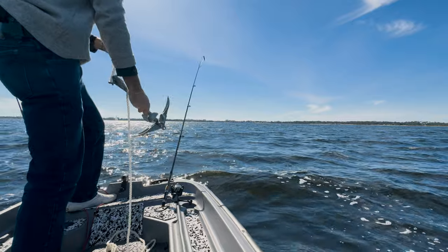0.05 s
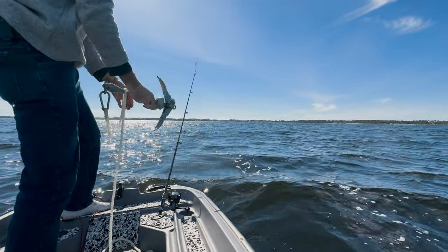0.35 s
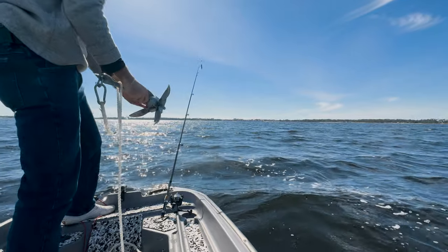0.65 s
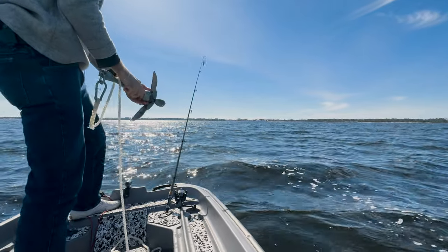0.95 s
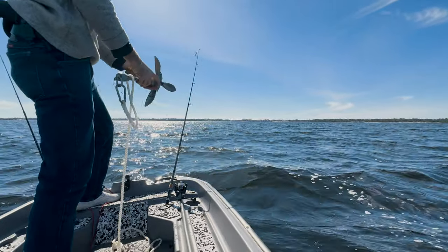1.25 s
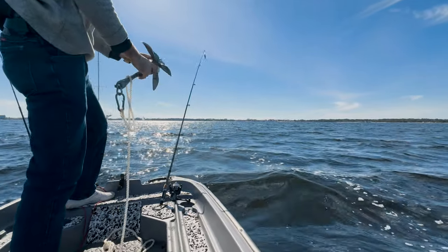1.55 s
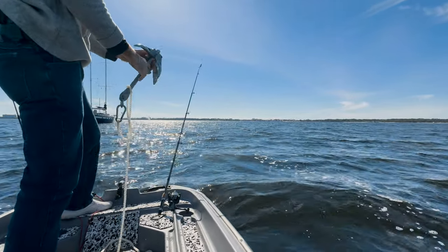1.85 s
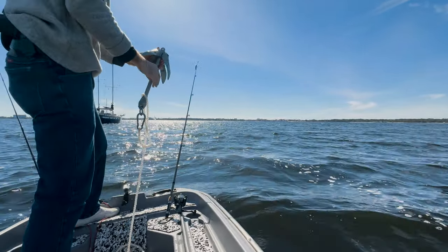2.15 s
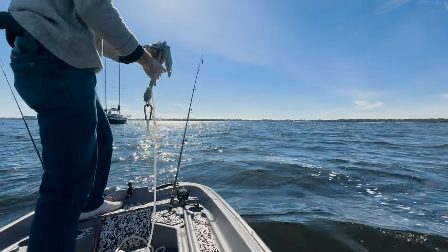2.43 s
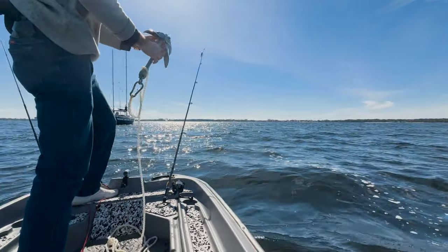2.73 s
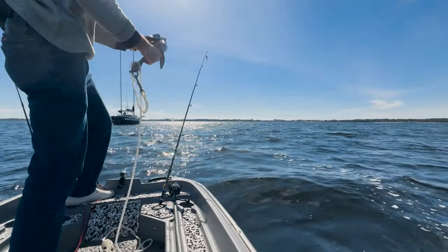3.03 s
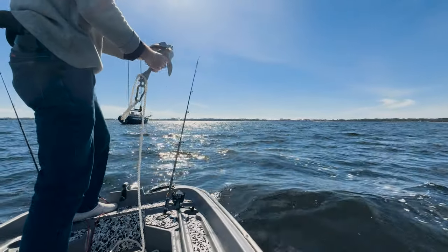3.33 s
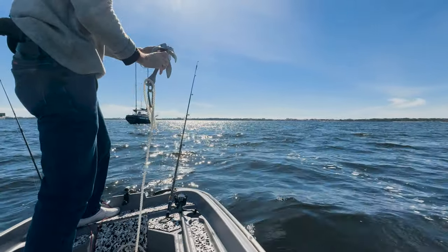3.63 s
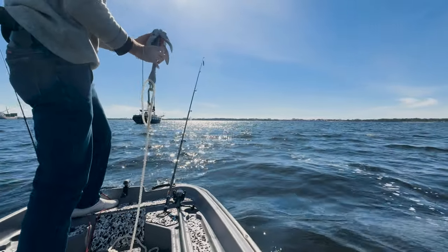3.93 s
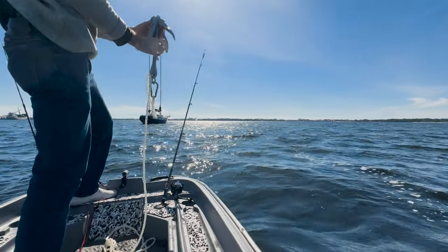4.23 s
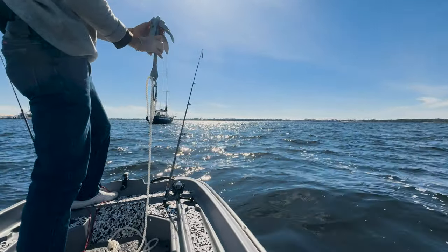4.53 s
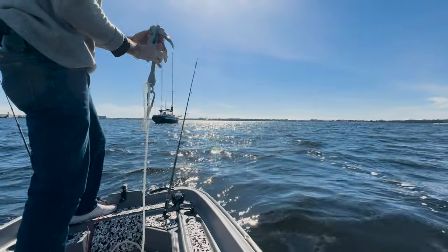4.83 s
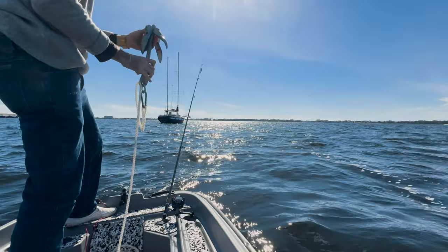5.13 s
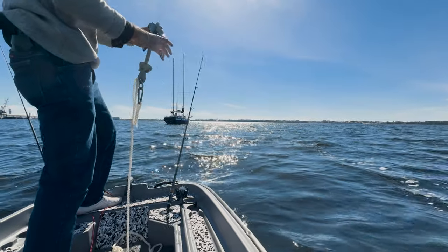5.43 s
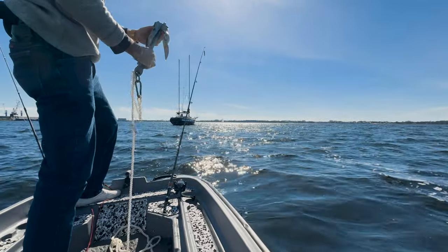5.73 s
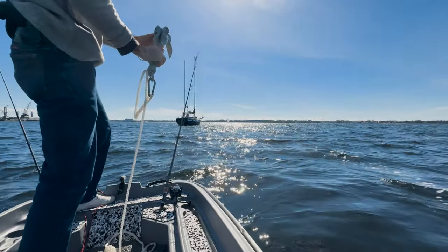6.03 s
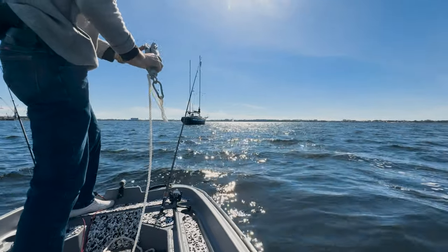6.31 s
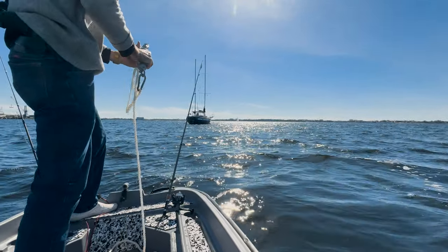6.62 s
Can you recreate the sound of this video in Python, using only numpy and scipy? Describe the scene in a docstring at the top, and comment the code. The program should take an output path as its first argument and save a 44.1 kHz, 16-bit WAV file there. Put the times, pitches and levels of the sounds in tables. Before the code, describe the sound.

Irregular sharp clinks of a handled metal anchor, over water sloshing at a small boat's hull and brief deck creaks.

```python
"""A folding steel anchor and its shackle clink, scrape and tick in someone's hands on a small boat's bow:
each contact excites the normal modes of the steel. The deck creaks by stick-slip friction as the boat
rolls, waves lap at the hull and trap air that rings as bubbles, sleeves and rope rustle, and open water
washes all round. The sound reaches two widely spaced microphones close by, slightly out of phase."""
import sys
import numpy as np
from scipy import signal
from scipy.fft import rfft, irfft, next_fast_len
from scipy.io import wavfile
from scipy.ndimage import uniform_filter1d, map_coordinates

SR = 44100
rng = np.random.default_rng(int(sys.argv[2]) if len(sys.argv) > 2 else 0)


def to_wav(s):
    """Save 16-bit WAV."""
    ch = np.atleast_2d(s).T  # columns
    pcm = np.round(np.clip(ch, -1, 1) * 32767)  # PCM
    wavfile.write(sys.argv[1], SR, pcm.astype(np.int16))


N = 298557

# Swell of the open water. Each row: time in seconds, relative level in dB.
SWELL_LEVELS = [(0.0, -55), (0.56, -55.5), (0.79, -57.5), (1.32, -51), (1.45, -55), (1.96, -56),
                (3.34, -56), (3.66, -54), (3.94, -57.5), (4.22, -54), (4.66, -58), (5.13, -51.5),
                (5.51, -58), (5.64, -56.5), (6.01, -55), (6.77, -57)]
# Steel striking steel. Each row: start in seconds, clack level in dB, clack pitch ratio, clack t60 in
# seconds, ring level in dB, nominal ring t60 in seconds, ring tilt in dB per octave, parts struck.
IMPACTS = [(0.0274, -53, 2, 0.026, -42, .19, -5, "link"), (.045, -43, 1.3, 0.047, -39.5, 0.047, 7, "link"),
           (0.0625, -34, 2.4, 0.027, -36, 0.031, 3, "link"),
           (.524, -32.5, 0.78, 0.034, -36.5, 0.83, -3.5, "shackle"),
           (1.237, -39, 0.73, 0.038, -46.5, 0.047, -21.5, "anchor shackle"),
           (1.4154, -37.5, 0.88, 0.034, -43, 0.088, 0, "shackle"),
           (1.476, -40, 1.44, 0.069, -36, 0.089, -3.5, "anchor"),
           (1.4905, -40.5, 1.3, 0.063, -36.5, 0.048, -10, "anchor"),
           (2.0595, -23, 0.82, 0.023, -19, 0.073, 0.5, "shackle"),
           (2.7812, -23.5, 1.6, 0.013, -9, 0.043, 0.5, "shackle"),
           (2.786, -23.5, 1.45, 0.034, -12.5, 0.026, -7, "anchor shackle"),
           (4.333, -42, 1.05, .018, -45.5, .15, -2.5, "anchor"),
           (4.8292, -31.5, 1.25, 0.042, -37, 0.12, 8, "anchor shackle"),
           (4.971, -24, 1.1, 0.031, -28, 0.063, 2, "anchor"),
           (4.991, -27.5, 0.93, 0.024, -36, 0.064, 0.5, "anchor shackle"),
           (5.0084, -21.5, 1.08, 0.036, -27.5, 0.15, -6, "anchor shackle"),
           (6.1353, -23, 1.09, 0.0036, -8, 0.2, -1, "anchor"),
           (6.139, -22.5, 2.9, 0.0061, -41, .05, 0.5, "anchor"),
           (6.2092, -38.5, 0.91, 0.029, -30, .096, -5.5, "anchor"),
           (6.237, -46, 1.03, 0.043, -29, 0.037, 0, "anchor"),
           (6.6394, -30, 0.93, 0.023, -17.5, 0.055, 8.5, "anchor"),
           (6.644, -38, 1.03, 0.11, -26, 0.091, 13, "anchor"),
           (6.6822, -44, 1.2, 0.017, -49.5, 0.14, -12, "anchor")]
# Steel sliding on steel. Each row: start in seconds, length in seconds, level in dB.
SLIDES = [(0.054, 0.022, -49.5), (2.019, 0.043, -48), (2.656, 0.036, -51.5), (2.768, 0.038, -43),
          (3.527, 0.044, -53.5), (4.926, 0.029, -41.5), (4.963, 0.016, -34.5), (5.011, 0.057, -41),
          (6, 0.019, -49), (6.625, 0.0076, -44.5)]
# Waves at the hull. Each row: crest time in seconds, rise time in seconds, level in dB.
WAVE_CRESTS = [(0.079, 0.0085, -44), (.755, 0.029, -48.5), (.98, 0.04, -53), (1.275, 0.068, -51),
               (1.76, 0.031, -53.5), (2.2, 0.073, -53.5), (2.82, 0.017, -52), (3.575, 0.041, -49.5),
               (4.14, 0.024, -52), (4.29, 0.054, -43.5), (5.165, 0.03, -46.5), (5.29, 0.037, -43.5),
               (5.886, 0.11, -51), (6.41, 0.093, -54.5)]
# Large air pockets. Each row: start in seconds, level in dB, starting frequency in Hz.
AIR_POCKETS = [(.749, -35.5, 393), (0.771, -45.5, 204), (2.14, -35, 407), (3.546, -34.5, 350),
               (3.562, -40, 243), (3.625, -32, 395), (4.125, -30, 500), (4.137, -37.5, 285),
               (4.226, -18, 1004), (4.301, -39, 181), (4.38, -20, 1000), (5.251, -27.5, 597),
               (5.275, -34, 263), (5.294, -28.5, 608)]
# Rubs of sleeves and rope. Each row: middle in seconds, half length in seconds, level in dB.
HAND_STROKES = [(0.14, 0.051, -60), (0.562, 0.087, -59), (1.2, 0.18, -67), (1.717, 0.12, -70),
                (2.504, .35, -69), (3.813, 0.31, -64), (4.836, 0.37, -62.5), (5.85, 0.34, -65.5)]
# Runs of deck slips. Each row: start in seconds, length in seconds, level in dB, slips per second.
SLIP_RUNS = [(0.283, .075, -28, 74), (0.942, .066, -27.5, 58), (1.224, .085, -30, 53),
             (1.726, .048, -33.5, 31), (2.524, .012, -31.5, 40), (2.827, .012, -28, 40),
             (4.243, .06, -30, 42), (5.131, .037, -31, 68), (5.77, .012, -33.5, 40), (5.865, .106, -30, 39),
             (6.375, .06, -36, 58), (6.508, .012, -33, 40)]
# Light touches of the fittings. Each row: start in seconds, level in dB, treble gain in dB.
TOUCHES = [(0.389, -49.5, -1), (1.0807, -45, -16), (1.115, -46, -6), (1.368, -43, -14), (1.444, -45, -2.5),
           (1.6098, -41.5, -19), (1.699, -53, 3.5), (1.9236, -63.5, 7), (2.136, -60.5, 7.5),
           (2.2509, -39, -22), (2.29, -37.5, -16), (2.3482, -43, -3), (2.422, -49.5, -4),
           (2.681, -36.5, -22), (2.708, -49.5, -1.5), (2.9959, -40.5, -16.5), (3.2255, -56.5, -3.5),
           (3.3424, -46, -33), (3.5861, -37, -21), (3.975, -41, -18), (4.487, -48.5, -11),
           (4.6222, -46, -32), (4.672, -46, -8.5), (5.172, -33.5, -2.5), (5.7607, -44, -2.5),
           (5.8346, -36, -17)]

# Modes of the steel. Each row: frequency in Hz, relative level in dB, t60 as a multiple of the contact's.
ANCHOR_MODES = [(2923, -13, .75), (3946, -27, .7), (4067, -27, .45), (5070, -29, .35), (6939, 0, 1),
                (7030, -15, .35), (9087, -20, .7), (10100, -24, .6), (11650, -17, .75), (12120, -27, .75),
                (13950, -25, .5)]
SHACKLE_MODES = [(4016, -9, .6), (5858, 0, 1.1), (5894, -7, 1.1), (9200, -26, .5), (12190, -24, .6),
                 (14510, -15, .55)]
LINK_MODES = [(7940, 6, 0.35), (10600, 3.5, 0.78), (10830, 13.5, 0.36), (11110, -4.5, 0.36)]
FLUKE_MODES = [(1600, -4, 1), (1956, 2.5, 1), (2125, -3, 1.3), (2347, 5, 0.72), (3020, -7, .8),
               (3094, 2, 1), (4150, -4.5, 2.4), (4110, -7.5, 1.2), (5670, -10.5, 0.81)]  # damped by the hand
# Ringing parts. Each row: name, modes, gain in purity per dB, sympathetic level in dB over the clack.
STEEL_PARTS = [("anchor", ANCHOR_MODES, .024, -19), ("shackle", SHACKLE_MODES, .012, -19),
               ("link", LINK_MODES, .012, -28)]
# Resonances of the deck panel. Each row: frequency in Hz, bandwidth in Hz, gain in dB.
DECK_MODES = [(500, 10, 16.5), (680, 118, 9.5), (924, 140, 7.5), (1350, 190, 2), (2050, 96, -1),
              (3470, 900, -50.5), (7000, 6900, -58.5)]

# Spectral envelopes. Each row: frequency in Hz, relative level in dB.
WASH_SPECTRUM = [(15, -70.5), (25, -45), (185, -13), (249, -8), (285, -7), (384, -2.5), (591, -1.5),
                 (714, -1), (887, 0.5), (1740, -6.5), (2160, -15), (2910, -22), (5280, -29.5),
                 (6920, -29.5), (16000, -48)]
CLACK_SPECTRUM = [(100, -26.5), (600, -45), (1300, 7), (2600, 0), (3500, 4), (4400, 2.5), (7000, -5),
                  (8500, -7.5), (12000, -19), (16000, -26.5)]
SLOSH_SPECTRUM = [(29, -65), (50, -32), (261, -6.5), (555, -3), (877, -4.5), (967, -18.5), (1460, -36.5),
                  (1890, -13.5), (2500, -33.5), (3250, -64), (5500, -120)]
CLOTH_SPECTRUM = [(1200, -21.5), (2500, 5), (4500, 0), (7000, -0.5), (9500, -10.5), (11500, 0),
                  (13500, -10.5), (15500, -5)]
TICK_BODY_SPECTRUM = [(200, -47), (1200, 2), (2200, 5.5), (4000, -7), (7000, -14.5), (16000, -53)]
TICK_TREBLE_SPECTRUM = [(200, -32), (3000, -45.5), (6500, -8), (9500, -11.5), (11500, 0), (16000, -23)]
DECK_RADIATION = [(60, -18.5), (170, -19.5), (330, -2), (16000, -16)]  # a small panel radiates little bass

# Stereo width of the noises. Each row: frequency in Hz, side minus mid level in dB.
DIFFUSE_WIDTH = [(60, -2.5), (110, -3.5), (200, -4), (380, 0.5), (700, 9.5), (1290, 4.5), (2380, -2),
                 (4400, -0.5), (8120, 0), (15000, 0.5)]
SLOSH_WIDTH = [(100, -10), (300, -5.5), (700, -0.5), (1300, 3), (2400, -3), (5000, -1), (8000, -2),
               (13000, 3)]
# Balance of the steel. Each row: frequency in Hz, left minus right level in dB.
STEEL_BALANCE = [(300, -10.5), (1200, 0.5), (2600, 3.5), (4500, -1), (6500, -3), (12000, 1)]
# Phase difference of sounds made at the hands. Each row: frequency in Hz, lead of the left in radians.
HAND_PHASE = [(100, .6), (700, 2.6), (1300, 1.5), (2400, 1.46), (5000, 1.24), (7000, 1.08), (12000, 1.6)]


def amp(db):
    """Convert decibels to an amplitude ratio."""
    return 10 ** (np.asarray(db) / 20)


def unit_rms(x):
    """Normalise to rms 1."""
    return x / np.sqrt(np.mean(x ** 2) + 1e-20)


def unit_blow(x):
    """Normalise a transient to rms 1 over its loudest 4 ms."""
    return x / np.sqrt(uniform_filter1d(x ** 2, size=SR // 250, mode="constant").max() + 1e-20)


def curve_at(points, hz):
    """Interpolate (Hz, value) points on a logarithmic frequency axis."""
    freqs, values = np.transpose(points)
    return np.interp(np.log(hz + 1), np.log(freqs + 1), values)


def wobble(rate):
    """Smooth random modulation with `rate` knots a second."""
    return map_coordinates(rng.standard_normal(int(N * rate / SR) + 4), [np.arange(N) * rate / SR])


def filtered(x, response):
    """Linear filtering: multiply the spectrum by a complex frequency response."""
    n = x.shape[-1]
    padded = next_fast_len(n + 4096)
    return irfft(rfft(x, padded) * response(np.fft.rfftfreq(padded, 1 / SR)), padded)[..., :n]


def coloured(x, spectrum, size=1024):
    """A minimum-phase filter is causal, so it shapes the spectrum and keeps attacks sharp."""
    cepstrum = irfft(np.log(amp(curve_at(spectrum, np.fft.rfftfreq(size, 1 / SR)))))
    cepstrum[1:size // 2] *= 2
    cepstrum[size // 2 + 1:] = 0
    return signal.fftconvolve(x, irfft(np.exp(rfft(cepstrum))))[:len(x)]


def add(track, start_s, x):
    """Superpose x on the track from start_s."""
    i = max(round(start_s * SR), 0)
    track[i:i + len(x)] += x[:max(len(track) - i, 0)]


def decay(t, t60):
    """Free decay is exponential, falling 60 dB in t60 seconds."""
    return np.exp(-np.log(1000) * t / max(t60, 1e-3))


def burst(t, t60):
    """Broadband excitation: white noise in exponential decay."""
    return rng.standard_normal(len(t)) * decay(t, t60)


def ring(modes, t, t60, scatter_db, tilt_db=0):
    """Modal superposition: damped sines, the weaker ones varying in level from blow to blow."""
    out = np.zeros(len(t))
    for hz, db, share in modes:
        db = db + scatter_db * rng.normal() * np.clip(-db / 10, 0, 1) + tilt_db * np.log2(hz / 6500)
        out += amp(db) * decay(t, t60 * share) * np.sin(2 * np.pi * (hz * t + rng.random()))
    return out


def stereo_noise(spectrum, width, patchy_db):
    """Partly coherent noise from mid and side, its gain varying in patches of time and frequency."""
    cells = signal.stft(rng.standard_normal((2, N)), nperseg=512)[2]
    patches = uniform_filter1d(rng.standard_normal(cells.shape[1:]), size=3, axis=0)
    patches = uniform_filter1d(patches, size=5, axis=1)
    pair = signal.istft(cells * amp(patchy_db * unit_rms(patches)), nperseg=512)[1][:, :N]
    mid = filtered(pair[0], lambda hz: amp(curve_at(spectrum, hz)))
    side = filtered(pair[1], lambda hz: amp(curve_at(spectrum, hz) + curve_at(width, hz)))
    return np.array([mid + side, mid - side]) / np.std(mid)


def from_hands(hz):
    """Phase lead in radians of the left microphone for a source at the hands."""
    return curve_at(HAND_PHASE, hz)


def on_board(x, left_lead, echo_db, echo_t60):
    """Path difference shifts the phase between the microphones; deck and gunwales scatter a brief echo."""
    t = np.arange(SR // 10) / SR
    reflections = [unit_rms(burst(t, echo_t60) * (t > .0035)) / np.sqrt(len(t)) for _ in range(2)]
    echo = amp(echo_db) * signal.fftconvolve(x[None], np.array(reflections), axes=1)[:, :N]
    return echo + filtered(x, lambda hz: np.exp(.5j * np.outer([1, -1], left_lead(hz))))


def open_water():
    """The sea is a diffuse noise source, amplitude-modulated by swell and ripple; swells lean left."""
    swell_db = np.interp(np.arange(N) / SR, *np.transpose(SWELL_LEVELS))
    pan_db = -3.5 + .6 * (swell_db - swell_db.mean())  # left minus right
    ripple_db = 1.4 * wobble(rate=25)
    wash = stereo_noise(WASH_SPECTRUM, DIFFUSE_WIDTH, patchy_db=3.5)
    return amp(swell_db + 2 + ripple_db) * amp([pan_db / 2, -pan_db / 2]) * wash


def clinks(free_t60=.1, choke_after_s=.096):
    """Impact excitation: the flukes clack, and anchor, shackle or link ring, each ring cut short about 0.1 s
    after the blow."""
    clacks, rings, t = np.zeros(N), np.zeros(N), np.arange(SR // 4) / SR
    attack = 1 - np.exp(-t / .00074)
    choke = attack * decay(np.maximum(t - choke_after_s, 0), t60=.014)
    for start, clack_db, pitch, clack_t60, ring_db, ring_t60, tilt_db, struck in IMPACTS:
        contact = attack * (burst(t, clack_t60) + amp(-35.5) * burst(t, t60=.11))
        clack = coloured(contact, [(hz * pitch, db) for hz, db in CLACK_SPECTRUM])
        add(clacks, start, amp(clack_db) * unit_blow(clack))
        flukes = ring(FLUKE_MODES, t, 1.7 * clack_t60, scatter_db=2.2, tilt_db=6.5 * np.log2(pitch))
        add(rings, start, amp(clack_db - 12) * attack * flukes)
        # Steel pressed on steel rings shorter and sharper than a free part.
        pressed = max(1 - ring_t60 / free_t60, 0)
        sharpening = 1 + .009 * pressed
        for name, modes, purity_per_db, sympathy_db in STEEL_PARTS:
            # A part that is not struck rings faintly in sympathy.
            db, t60 = (ring_db, ring_t60) if name in struck else (clack_db + sympathy_db, .06)
            # A square blow sings on the main mode; a glancing one spreads over them all.
            purity = np.clip(1 + purity_per_db * (db + 16.5) - .071 * pressed, .18, 1)
            excited = [(hz * sharpening, level * purity, share) for hz, level, share in modes]
            add(rings, start, amp(db) * choke * ring(excited, t, t60, scatter_db=.67, tilt_db=tilt_db))
    rings = on_board(rings, from_hands, echo_db=-20, echo_t60=.04)
    return rings + on_board(clacks, from_hands, echo_db=-15.5, echo_t60=.0063)


def scrapes():
    """Forced vibration: sliding steel catches in tiny uneven slips that keep driving its modes."""
    out, t = np.zeros(N), np.arange(SR // 10) / SR
    for start, length, db in SLIDES:
        friction = rng.standard_normal(len(t)) * np.exp(.7 * rng.standard_normal(len(t)))
        friction *= decay(np.maximum(t - length, 0), t60=.03)
        anchor = ring(ANCHOR_MODES, t, t60=.035, scatter_db=4)
        shackle = .6 * ring(SHACKLE_MODES, t, t60=.035, scatter_db=3)
        flukes = ring(FLUKE_MODES, t, t60=.03, scatter_db=2)
        ringing = unit_blow(signal.fftconvolve(friction, anchor + shackle + flukes)[:len(t)])
        rasp = unit_blow(coloured(friction, CLACK_SPECTRUM))
        add(out, start, amp(db) * (amp(2) * rasp + amp(1) * ringing))
    return on_board(out, from_hands, echo_db=-14, echo_t60=.044)


def bubble(hz, cycles, rise):
    """An air pocket is a damped oscillator; its frequency climbs by the fraction `rise` as it rings."""
    age = np.arange(int(SR * cycles / hz) + 2) * hz / (SR * cycles)  # 0 to 1
    phase = 2 * np.pi * cycles * (age + rise * age ** 2 / 2)
    return np.sin(phase) * (1 - np.exp(-age * cycles)) * np.exp(-5.5 * age)


def hull_waves(bubble_count=900, fall_over_rise=1.98, calm_db=-65, right_lead_s=.00038):
    """Air entrainment: each wave sloshes up the hull and drains away, trapping bubbles that resonate."""
    t = np.arange(N) / SR
    lapping = np.full(N, amp(calm_db))
    for crest, rise, db in WAVE_CRESTS:
        age = (t - crest) / rise
        lapping += amp(db) * np.exp(-np.where(age < 0, age ** 2, age / fall_over_rise))
    slosh = amp(-1.5) * lapping * stereo_noise(SLOSH_SPECTRUM, SLOSH_WIDTH, patchy_db=5)
    bubbles = np.zeros(N)
    for when, pitch, size in rng.random((bubble_count, 3)):
        gain = amp(-13.5 + 8.2 * size ** 2) * lapping[int(when * N)]
        add(bubbles, when * N / SR, gain * bubble(200 * 7 ** pitch, cycles=6.7, rise=.15))
    for start, db, hz in AIR_POCKETS:
        add(bubbles, start, amp(db) * bubble(hz, cycles=16.6, rise=.12))
    gurgle = on_board(bubbles, lambda hz: -2 * np.pi * hz * right_lead_s, echo_db=-11.5, echo_t60=.026)
    # Small waves carry little deep bass.
    water = filtered(slosh + gurgle, lambda hz: hz ** 4 / (hz ** 4 + 100 ** 4))
    return water * amp([[-.8], [.8]])  # a little louder on the right


def rustle(speck_count=220, resting_db=-73.5):
    """Friction noise of sleeves and rope swells with each stroke of the hands, among dry specks of sound."""
    t = np.arange(N) / SR
    strokes = sum(amp(db) * np.exp(-((t - middle) / half) ** 2) for middle, half, db in HAND_STROKES)
    flicker = unit_rms(amp(3 * wobble(rate=45) + 4.5 * wobble(rate=700)))
    hiss = stereo_noise(CLOTH_SPECTRUM, DIFFUSE_WIDTH, patchy_db=2.5)
    cloth = (amp(resting_db) + strokes) * flicker * hiss
    specks = np.zeros(N)
    for when, size in rng.random((speck_count, 2)):
        specks[int(when * N)] = amp(-46.5 + 17 * size ** 4)
    return cloth + on_board(coloured(specks, TICK_TREBLE_SPECTRUM), from_hands, echo_db=-6.5, echo_t60=.02)


def deck_slip(t):
    """One slip knocks and rubs the deck panel, exciting its resonances at a slightly random pitch."""
    force = amp(-19.5) * burst(t, t60=.03) + amp(-26.5) * burst(t, t60=.098)
    force[0] = 1  # the knock
    detune = 1 + .041 * rng.normal()
    panel = lambda hz: sum(amp(db) * 1j * hz * width / ((centre * detune) ** 2 - hz ** 2 + 1j * hz * width)
                           for centre, width, db in DECK_MODES)
    return unit_blow(filtered(force, panel))


def creaks(jitter_s=.0013, scatter_db=1, left_lead_s=.00043):
    """Stick-slip friction: the deck catches and lets go at a nearly even rate while each load lasts."""
    slips, t = np.zeros(N), np.arange(SR // 8) / SR
    for start, length, db, rate in SLIP_RUNS:
        for age in np.arange(0, length, 1 / rate):
            late_s, extra_db = rng.standard_normal(2) * [jitter_s, scatter_db]
            add(slips, start + age + late_s * (age > 0), amp(db + extra_db) * deck_slip(t))
    radiated = coloured(slips, DECK_RADIATION)
    return on_board(radiated, lambda hz: 2 * np.pi * hz * left_lead_s, echo_db=-.5, echo_t60=.053)


def ticks():
    """A light impact gives a dry contact click and only weakly excites the modes of the steel."""
    out, t = np.zeros(N), np.arange(SR // 8) / SR
    for start, db, treble_db in TOUCHES:
        body = unit_blow(coloured(burst(t, t60=.026), TICK_BODY_SPECTRUM))
        treble = amp(3.5) * unit_blow(coloured(burst(t, t60=.008), TICK_TREBLE_SPECTRUM))
        anchor = amp(-9) * ring(ANCHOR_MODES, t, t60=.066, scatter_db=5.5)
        shackle = amp(-19.5 + 3 * rng.normal()) * ring(SHACKLE_MODES, t, t60=.13, scatter_db=7.5)
        add(out, start, amp(db) * (body + shackle + amp(treble_db) * (treble + anchor)))
    return on_board(out, from_hands, echo_db=-10.5, echo_t60=.055)


def scene():
    """Superposition of the sources: the steel, too small to radiate bass, over the boat and the sea."""
    balance = lambda hz: amp(np.outer([.5, -.5], curve_at(STEEL_BALANCE, hz)))
    steel = filtered(clinks() + ticks() + scrapes(), lambda hz: balance(hz) * hz ** 2 / (hz ** 2 + 250 ** 2))
    return steel + creaks() + open_water() + hull_waves() + rustle()


def record(dry):
    """Band limiting: a steep low-pass filter removes the treble above 15.8 kHz."""
    return filtered(dry, lambda hz: 1 / (1 + (hz / 15800) ** 120))


dry = scene()
out = record(dry)
to_wav(out)
```